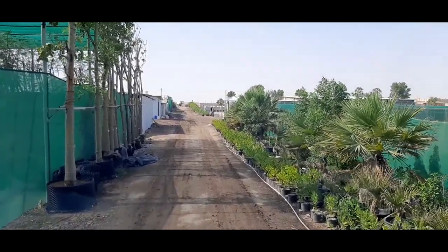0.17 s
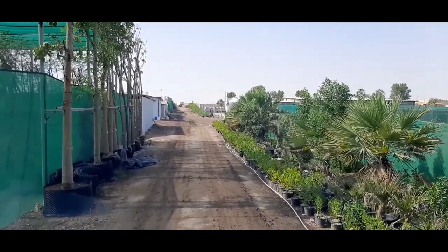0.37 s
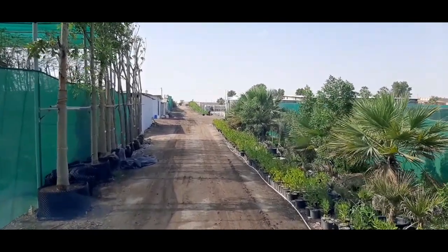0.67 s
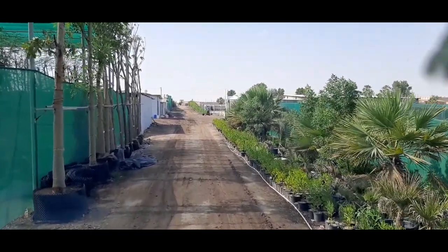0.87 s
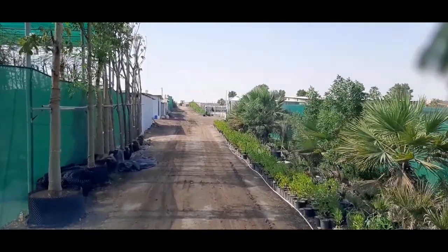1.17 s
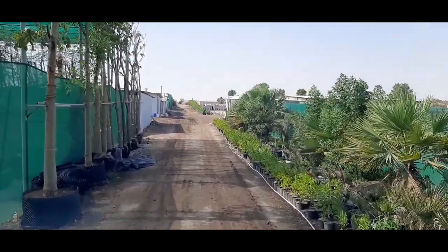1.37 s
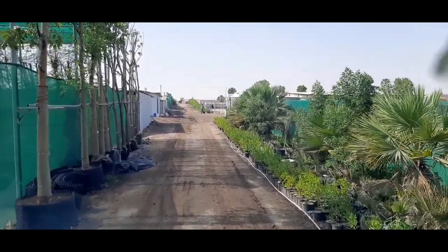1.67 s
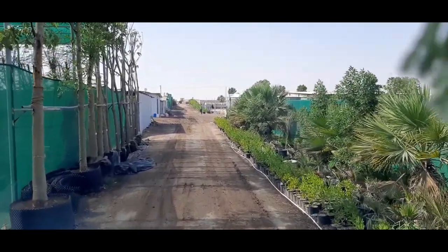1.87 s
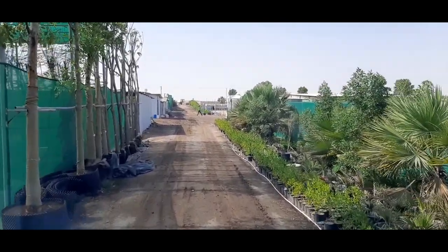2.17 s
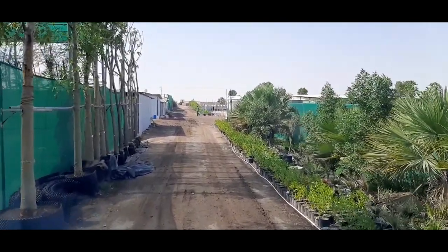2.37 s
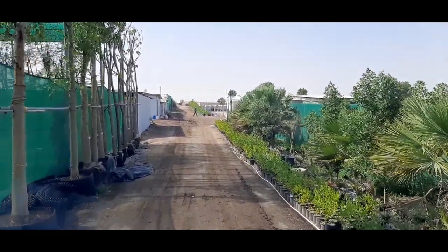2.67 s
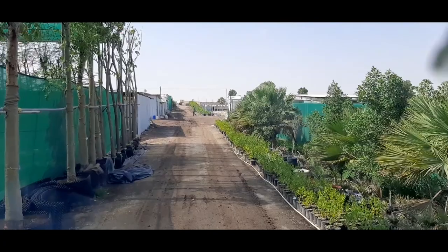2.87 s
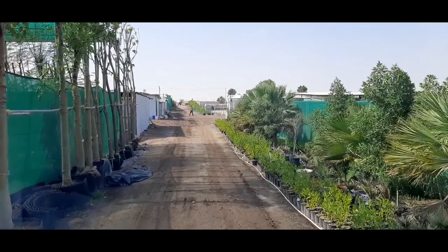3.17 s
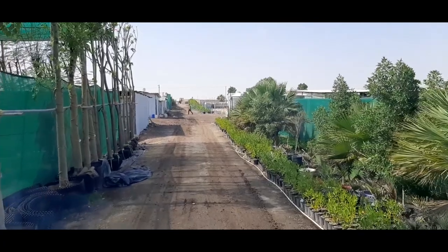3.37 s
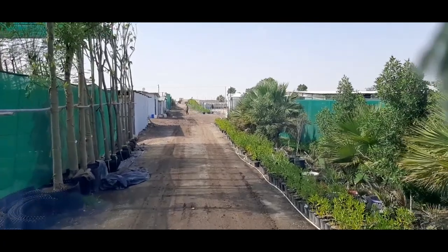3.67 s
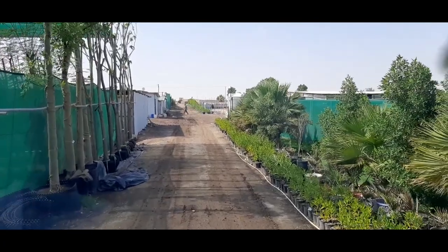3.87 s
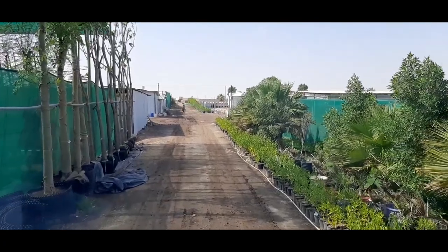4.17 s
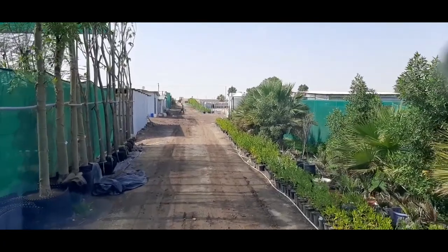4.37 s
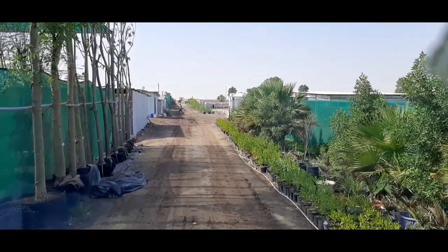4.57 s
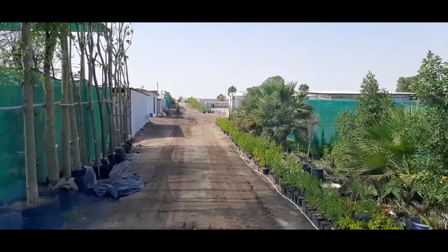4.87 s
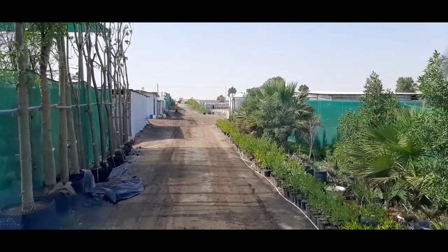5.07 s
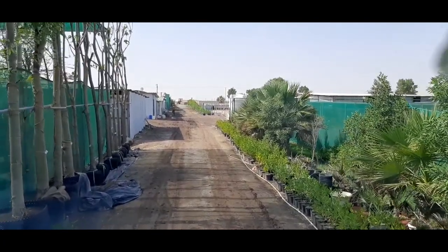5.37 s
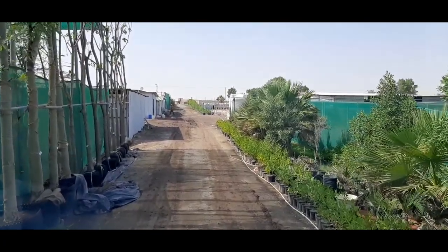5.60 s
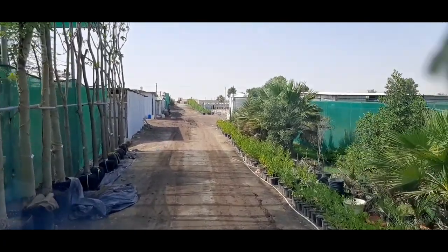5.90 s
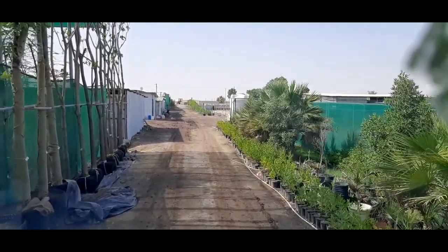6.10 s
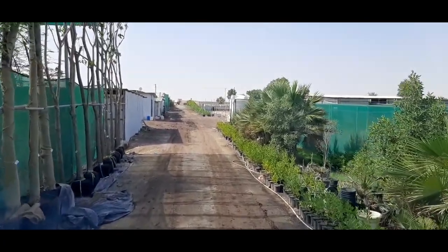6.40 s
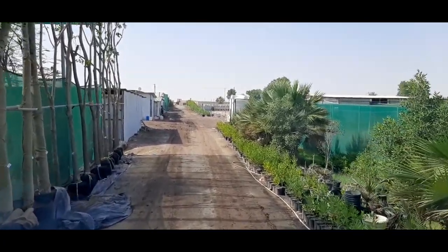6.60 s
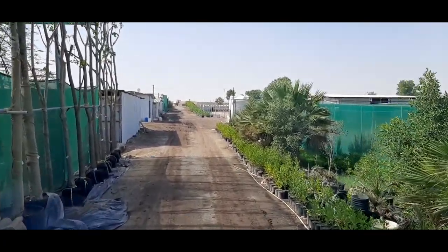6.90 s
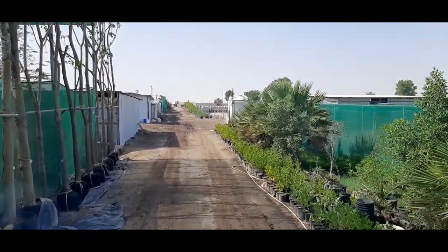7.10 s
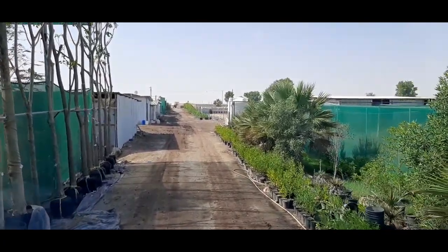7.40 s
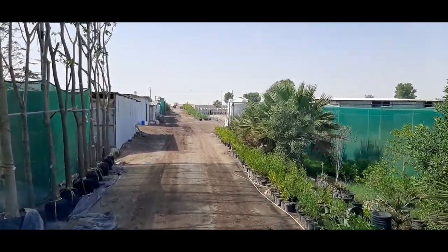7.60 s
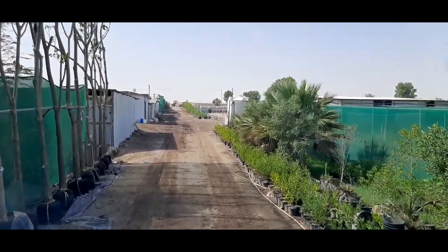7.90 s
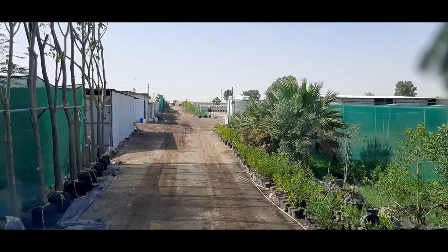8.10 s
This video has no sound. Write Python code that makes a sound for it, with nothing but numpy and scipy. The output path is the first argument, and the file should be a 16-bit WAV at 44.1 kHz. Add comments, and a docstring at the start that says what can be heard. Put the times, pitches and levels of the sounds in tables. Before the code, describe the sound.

A diesel truck's engine drones inside the cab at low speed, with road rumble, rattling trim and a few bumps.

```python
"""Inside a slow diesel truck on a dirt track

A six-cylinder engine booms in the cab as a stack of low tones, and each firing adds a knock.
The road rumbles through the cab panels. Loose trim buzzes in short puffs of noise, grit and
small parts tick, ruts jolt the cab into a low ring, and two bumps knock a panel.
The steady sounds reach the right side of the microphone a little before the left."""
import sys
import numpy as np
from scipy import signal
from scipy.fft import rfft, irfft, next_fast_len
from scipy.io import wavfile

SR = 44100
rng = np.random.default_rng(int(sys.argv[2]) if len(sys.argv) > 2 else 0)


def bounce(signal):
    """Save signal as a 16-bit WAV file at the path given by the first command-line argument."""
    frames = np.transpose(np.atleast_2d(signal))
    limited = np.clip(frames, -1, 1)
    pcm = np.round(limited * 32767).astype(np.int16)
    wavfile.write(sys.argv[1], SR, pcm)


N = 363825
TIME = np.arange(N) / SR
SIZE = next_fast_len(N)
HZ = np.fft.rfftfreq(SIZE, 1 / SR)

# How hard the engine works: time_s, load (0 coasting, 1 pulling)
LOAD = [(0, 0.73), (.4, 0.34), (4.2, 0.37), (4.7, 0.94), (5.8, 0.53), (6.3, 1), (8.25, 0.82)]
# How often the engine fires: time_s, firings_per_s
FIRING_RATE = [(0, 44.75), (.75, 43.55), (1.2, 43.7), (1.55, 43.35), (2.05, 44.55), (2.45, 44.1), (3, 44.2),
               (3.4, 43.85), (4.2, 44.35), (4.8, 45.9), (5.15, 46.1), (5.7, 45.7), (6.05, 46.35),
               (6.4, 47.4), (6.7, 47.2), (7.1, 48.9), (7.4, 49.75), (7.8, 49.8), (8.25, 51.45)]
# How the six cylinders differ: delay_in_firings, strength_db
CYLINDERS = [(0.049, 2), (0.032, 3.5), (-0.0052, -21), (0.0045, -6), (-0.021, -3.5), (0.016, 1)]


def gain_of(db):
    """Turns decibels into a number to multiply by."""
    return 10 ** (np.asarray(db) / 20)


def evened(x):
    """Scales a signal to an average (rms) level of 1."""
    return x / np.sqrt(np.mean(x ** 2) + 1e-20)


def curve(rows, column=1, t=TIME):
    """Reads one column of a time table at the times t."""
    rows = np.array(rows)
    return np.interp(t, rows[:, 0], rows[:, column])


def spectrum(rows, column=1):
    """Reads one column of a pitch table at every frequency."""
    rows = np.array(rows)
    return np.interp(np.log(HZ + 1), np.log(rows[:, 0] + 1), rows[:, column])


def ringing(modes):
    """A gain that lifts the pitches at which an object likes to ring."""
    peaks = sum((gain_of(2 * db) - 1) / (1 + (2 * (HZ - hz) / width) ** 2) for hz, width, db in modes)
    return np.sqrt(1 + peaks)


def coloured(x, gain):
    """Filters a sound with one gain for each frequency."""
    return irfft(rfft(x, SIZE) * gain, SIZE)[..., :N]


def drift(top_hz, t=TIME):
    """A random wobble of average size 1, no faster than top_hz."""
    knots = TIME[::200]
    rates = np.geomspace(top_hz / 10, top_hz, num=12)
    waves = sum(np.sin(2 * np.pi * (hz * knots + rng.random())) / np.sqrt(hz) for hz in rates)
    return np.interp(t, knots, evened(waves))


def by_load(pair, load):
    """Blends a (coasting, pulling) pair of values."""
    return pair[0] + load * (pair[1] - pair[0])


def stereo(a, b):
    """Makes left and right from two sounds: both sides share a, which comes later on the left."""
    # How alike the two sides are: pitch_hz, likeness (0 to 1), left_lead_rad
    likeness = [(50.3, 1, -1.7), (125, 1, -1.5), (290, 0.79, -0.5), (563, 0.37, -0.1), (990, 0.3, -2.5),
                (1390, 0.49, -3.5), (2480, 0.1, -6.5), (4820, 0, -12.5), (15900, 0.34, -46)]
    # Which side is louder: pitch_hz, left_minus_right_db
    balance = [(60, 3), (200, 1.5), (380, -.5), (700, 2), (1290, 1), (2380, 1.5), (4400, -1), (8120, -3.5),
               (15000, -4.5)]
    a, b = rfft(a, SIZE), rfft(b, SIZE)
    lean = gain_of(spectrum(balance) / 2)
    alike = np.clip(spectrum(likeness), 0, 1)
    left = a * np.exp(1j * spectrum(likeness, column=2)) * lean
    right = (alike * a + np.sqrt(1 - alike ** 2) * b) / lean
    return irfft(np.array([left, right]), SIZE)[:, :N]


def pan(db, lean_db):
    """Left and right gains around db, with the left louder by lean_db."""
    return gain_of(db + np.array([[.5], [-.5]]) * lean_db)


def tone(angle, db, lean_db, lead_rad):
    """A stereo sine wave whose left side is ahead by lead_rad."""
    return np.sqrt(2) * pan(db, lean_db) * np.cos([angle + lead_rad / 2, angle - lead_rad / 2])


def add(mix, start_s, sound):
    """Lays a stereo sound into the mix."""
    part = mix[:, round(start_s * SR):][:, :sound.shape[1]]
    part += sound[:, :part.shape[1]]


def engine_boom(firings):
    """Wavering tones bunch into a chug. A tone of order n swings n times in each six firings."""
    # The two main tones: time_s, boom_db (order 12), drone_db (order 14)
    main_levels = [(0, -18, -52), (.6, -24, -43), (.85, -42, -30), (1.3, -25.5, -41), (1.8, -35, -34),
                   (2.15, -22, -34), (2.55, -24.5, -32), (2.8, -43, -35), (3.05, -21, -70), (3.4, -27, -52),
                   (4.4, -23, -34.5), (4.85, -21.5, -15.5), (5.65, -24, -21), (6, -23.5, -30.5),
                   (6.25, -21, -24.5), (6.55, -21.5, -16.5), (7.2, -20, -22.5), (7.55, -26, -28),
                   (7.85, -20.5, -19), (8.25, -23, -33)]
    # Low engine tones, each with its own level and place left to right:
    # order, left_minus_right_db, left_lead_rad
    boom_tones = [(6, 3.9, -1.), (12, 2.8, -.15), (14, 3.5, -.8), (16, 1.9, -.7), (18, 1.5, -.6)]
    # Further engine hum tones, blended between coasting and pulling: order, coasting_db, pulling_db
    hum_tones = [(8, -43, -36.5), (9, -56, -29.5), (10, -46.5, -26), (13, -48, -46), (15, -25.5, -39.5),
                 (19, -29.5, -46.5), (20, -42, -50), (21, -48, -33), (23, -29.5, -53.5), (24, -37.5, -51),
                 (30, -44.5, -43), (34, -55, -46.5), (46, -65, -50.5)]
    # High tones that whine through the wall behind the engine: order, coasting_db, pulling_db
    whine_tones = [(54, -64, -55), (60, -62, -51), (66, -60, -49), (69, -60, -53), (70, -52, -64),
                   (72, -54, -50), (75, -55, -50), (78, -57, -56), (81, -47.5, -50), (86, -52, -50),
                   (90, -52, -48)]
    # Tones that trail the chug and fill its gaps: order, delay_turns
    late_turns = {6: .5, 9: .25, 16: .25, 21: .25, 24: .25}
    step = 10  # low tones need only every tenth sample
    t, out = TIME[::step], 0
    load = np.clip(curve(LOAD, t=t), 0, 1)
    cycle_rad = 2 * np.pi * firings[::step] / len(CYLINDERS) + 2.14
    cycle_hz = curve(FIRING_RATE, t=t) / len(CYLINDERS)
    chug_rad = by_load((0, -1), load)

    def angle_of(order, wobble_rad):
        steady = order * cycle_rad + chug_rad - 2 * np.pi * late_turns.get(order, 0)
        return steady + wobble_rad * drift(3, t)

    firing_db = by_load((-51, -32), load)
    boom_db, drone_db = curve(main_levels, t=t), curve(main_levels, column=2, t=t)
    order_16_db = by_load((-31, -32.5), load)
    order_18_db = by_load((-20, -30.5), load) + .28 * (boom_db - boom_db.mean())
    levels = firing_db, boom_db, drone_db, order_16_db, order_18_db
    for (order, lean_db, lead_rad), db in zip(boom_tones, levels):
        angle = angle_of(order, wobble_rad=.18)
        waver_db = by_load((1.6, .9), load) * drift(4.4, t)
        out += tone(angle, db + waver_db, lean_db, lead_rad)
    for order, *pair_db in hum_tones:
        angle = angle_of(order, wobble_rad=by_load((.48, .26), load))
        db = by_load(pair_db, load) + by_load((3, 1.1), load) * drift(2.5, t)
        if order == 30:  # this tone dies away above 236 Hz
            db -= .5 * np.maximum(order * cycle_hz - 236, 0)
        out += tone(angle, db, lean_db=2.2, lead_rad=-.75)
    for order, *pair_db in whine_tones:
        wall_loss_db = .15 * np.maximum(order * cycle_hz - 625, 0)  # fades above 625 Hz
        db = by_load(pair_db, load) - wall_loss_db + 1.8 * drift(2.5, t)
        angle = order * cycle_rad + 2 * np.pi * rng.random() + .62 * drift(3, t)
        out += tone(angle, db, lean_db=5, lead_rad=-.16)
    return signal.resample_poly(out, step, 1, axis=1, window=("kaiser", 10))[:, :N]


def firing_knock(firings):
    """Each firing strikes the engine block; the cylinders differ in strength and timing."""
    # Tone colour of the knock: pitch_hz, level_db
    knock_colour = [(150, -45.5), (300, -13), (500, 16), (680, 4), (800, -8), (1250, -31), (2500, -40),
                    (4000, -53.5)]
    count = np.arange(1, int(firings[-1]))
    delay, db = np.array(CYLINDERS)[count % len(CYLINDERS)].T
    timing_jitter, level_jitter = rng.standard_normal((len(count), 2)).T
    start_s = np.interp(count + delay + .003 * timing_jitter, firings, TIME)
    blows = np.zeros(N)
    blows[(start_s * SR).astype(int)] = gain_of(db + .55 * level_jitter)
    # the block answers every blow with the same short scatter of echoes
    echoes = rng.standard_normal((2, 1500)) * gain_of(-60 * TIME[:1500] / .081)
    knocks = signal.oaconvolve(blows[None], echoes)[:, :N]
    a, b = coloured(knocks, gain_of(spectrum(knock_colour)))
    return gain_of(-49 + .61 * curve(LOAD)) * evened(stereo(a, b))


def road_rumble(firings):
    """Noise comes through the cab panels, throbbing a little with each firing and with the road."""
    # Road and engine noise in the cab: pitch_hz, level_db
    rumble_colour = [(18, -67), (33, -34), (60, -10), (78, 0), (119, -1), (148, -6), (221, -17),
                     (351, -20.5), (439, -24.5), (654, -25.5), (747, -27.5), (1220, -31.5), (1450, -37.5),
                     (1980, -40), (3940, -54.5), (6000, -62), (7800, -100), (13200, -120)]
    # Panels that ring along: pitch_hz, width_hz, boost_db
    panel_rings = [(295, 70, 3), (359, 16, 7), (510, 28, 6), (595, 7, 8), (665, 35, 7), (833, 8, 9),
                   (858, 20, 4), (924, 22, 5), (1200, 45, 5), (1250, 9, 6), (1385, 20, 4), (1690, 40, 3),
                   (1960, 60, 3), (2502, 14, 10)]
    # How the rumble rises and falls: time_s, level_db
    road_level = [(0, -32), (.5, -32.5), (1.6, -32), (2, -31), (2.5, -32.5), (3.5, -31.5), (4.5, -31.5),
                  (5.5, -33), (6.5, -32.5), (7.5, -33.5), (8.25, -32)]
    a, b = coloured(rng.standard_normal((2, N)), gain_of(spectrum(rumble_colour)) * ringing(panel_rings))
    mid_level = np.sqrt(np.mean(coloured(a, (HZ > 200) & (HZ < 1500)) ** 2))
    throb_db = 1.5 * np.cos(2 * np.pi * firings) + .45 * drift(12)
    return gain_of(curve(road_level) - 1 + throb_db) * stereo(a, b) / mid_level


def trim_buzz():
    """Each tap of loose trim is a puff of noise and a short scrape, over a faint hiss."""
    # The clearest taps: start_s, level_db, dull_band_offset_db, scrape_offset_db
    clear_taps = [(0.0438, -53, -1, -9), (0.0593, -52, -3, -9), (0.19, -47, -4, -15),
                  (0.6225, -43, -6, -12), (0.6918, -41, 0, -5), (0.8759, -40, 3, -17),
                  (0.9797, -37, -6, -5), (1.068, -38, 0, -7), (1.1922, -45, -1, -15), (1.2665, -37, 0, -4),
                  (1.5529, -61, -3, -14), (1.6846, -47, -8, -14), (1.9904, -40, 5, -11),
                  (2.0772, -34, 7, -14), (2.2443, -47, -1, -11), (2.2932, -39, -5, -16),
                  (2.3206, -34, -11, -8), (2.4364, -36, 3, -11), (2.6209, -37, -2, -9),
                  (2.7317, -55, -5, -9), (2.9771, -40, 1, -9), (3.1742, -46, -15, -9),
                  (3.2201, -46, -1, -13), (3.2575, -39, 5, -19), (3.4356, -40, -1, -9),
                  (3.4845, -38, 3, -9), (3.5753, -37, -1, -12), (3.8077, -49, -9, -15),
                  (3.8417, -45, 2, -5), (3.8836, -40, 1, -7), (3.918, -38, 3, -15), (3.9419, -41, -1, -7),
                  (4.0262, -33, 3, -12), (4.0841, -43, -1, -4), (4.1674, -38, -1, -13),
                  (4.2577, -54, -7, -11), (4.3046, -45, -1, -13), (4.3186, -38, -1, -11),
                  (4.3939, -40, -6, -9), (4.4593, -42, -10, -9), (4.5151, -41, -9, -7),
                  (4.5905, -42, 2, -7), (4.6907, -46, -1, -9), (4.7127, -40, -8, -21),
                  (4.794, -44, -6, -11), (4.889, -38.5, 2, -6), (5.0574, -39, 2, -6), (5.2934, -41, 1, -16),
                  (5.3393, -40, -3, -9), (5.3901, -42, 4, -15), (5.4226, -53, -3, -18),
                  (5.4794, -40, 4, -9), (5.5478, -40, -3, -16), (5.6605, -44, 5, -6), (5.682, -39, 0, -9),
                  (5.7997, -41, -1, -9), (5.8795, -39, 1, -6), (5.9604, -36, 1, -7), (6.0526, -44, -1, -17),
                  (6.1978, -46, -5, -9), (6.2143, -38, -8, -5), (6.2776, -43, -6, -15),
                  (6.3056, -39, -5, -9), (6.4158, -49, -3, -9), (6.4338, -37, -5, -8),
                  (6.4966, -37.5, 2, -6), (6.6383, -41, -1, -10), (6.8349, -62, -11, -13),
                  (7.3961, -53, -4, -13), (7.4535, -39, 3, -9), (7.4859, -43, -3, -15),
                  (7.6854, -45, -1, -5), (7.7648, -43, 10, -10), (7.7902, -43, 3, -9),
                  (7.8311, -37, -1, -8), (7.8875, -43, -1, -9), (7.9518, -40, -6, -9), (8.0177, -41, 3, -8),
                  (8.0581, -42, -1, -10), (8.1115, -40, -5, -10)]
    # Lighter chatter between them: time_s, level_db
    chatter_level = [(0, -36), (.5, -42.5), (1.7, -32), (2.7, -37), (4.4, -33), (5.4, -40.5), (6.9, -42),
                     (7.8, -36), (8.25, -56)]
    # Tone colour of the buzz: pitch_hz, level_db
    trim_colour = [(1500, 7), (2800, 0), (4500, -1.5), (7000, -2.5), (9000, -4), (11000, -2.5), (13000, -4),
                   (14500, -5), (16000, -5)]
    # Where the trim rings: pitch_hz, width_hz, boost_db
    trim_rings = [(2500, 150, 4), (7510, 130, 6), (11080, 300, 2.5), (14420, 300, 3)]
    gap_s, rise_s, puff_s, scrape_s = .022, .0012, .0037, .039
    light_s = np.arange(0, TIME[-1] - gap_s, gap_s)
    light_s += rng.random(len(light_s)) * gap_s
    light_taps = [(s, db - 8, 0, -10.5) for s, db in zip(light_s, curve(chatter_level, t=light_s))]
    start_s, db, dull_db, scrape_db = np.transpose(light_taps + clear_taps)
    # three bands (dull, bright, top) each get their own random strength
    chance_db = np.array([[2], [1.5], [3.5]]) * rng.standard_normal((len(start_s), 3)).T
    db = db - .5 + np.outer([1, 0, 0], dull_db) + chance_db
    taps, scrapes = np.zeros((2, 3, N))
    starts = (start_s * SR).astype(int)
    taps[:, starts] = gain_of(db)
    scrapes[:, starts] = gain_of(db + scrape_db)
    t = TIME[None, :4000]
    rise = (1 - np.exp(-t / rise_s)) ** 2
    hiss = gain_of(-51.5 + 2.9 * drift(48) + 1.7 * np.array([drift(30) for _ in range(3)]))
    puffs = signal.oaconvolve(taps, rise * np.exp(-t / puff_s))[:, :N]
    scraping = signal.oaconvolve(scrapes, rise * np.exp(-(t / scrape_s) ** 2))[:, :N]
    colour = evened(gain_of(spectrum(trim_colour)) * ringing(trim_rings))
    high, top = (1 / (1 + (hz / (HZ + 1)) ** 6) for hz in (6500, 10500))
    bands = 1 - high, high * (1 - top), high * top
    a, b = sum(coloured(rng.standard_normal((2, N)) * level, colour * np.sqrt(band))
               for level, band in zip(hiss + puffs + scraping, bands))
    return gain_of(-3) * stereo(a, b)


def tick(hz, clack_db):
    """One small hit: a dry burst of noise spreading up from hz, a thin ring and a duller clack."""
    t, f = TIME[:4096], np.fft.rfftfreq(4096, 1 / SR)
    a, b = rfft(rng.standard_normal((2, 4096)))
    width_hz = np.where(f < hz, .12, .5) * hz  # falls off steeply below its pitch
    burst = evened(irfft(a / (1 + ((f - hz) / width_hz) ** 2) / (1 + (f / 8200) ** 8)))
    clack = evened(irfft(b / (1 + ((f - 1900) / 790) ** 2) * (f > 700)))
    ring = gain_of(-1 - 60 * t / .045) * np.sin(2 * np.pi * (hz * t + rng.random()))
    rise = 1 - np.exp(-t / .0007)
    fall = .65 * gain_of(-60 * t / .065) + .35 * gain_of(-60 * t / .12)
    return ((burst + clack * gain_of(clack_db)) * fall + ring) * rise


def grit():
    """Grit and fittings tick faintly at random, more often on the rougher first stretch."""
    out = np.zeros((2, N))
    for when, size, pitch, side in rng.random((120, 4)):
        gains = pan(-64 + 6 * size, lean_db=6 * side - 21)  # well to the right
        add(out, when ** 1.3 * N / SR, gains * tick(2400 * 2.5 ** pitch, clack_db=0))
    return out


def rut_jolts():
    """Each rut jolts the cab, which swells into a low ring at its own pitch and dies away."""
    # The jolts: start_s, level_db, pitch_hz
    jolts = [(0.3, -13.5, 104), (1.331, -16, 119.3), (1.861, -8, 114), (2.124, -15, 102.8),
             (2.348, -15, 113), (4.152, -15, 115.4)]
    rise_s, fade_s = .014, .58  # fade_s is the time to drop 60 dB
    out, t = np.zeros((2, N)), TIME[:SR]
    for start_s, db, hz in jolts:
        angle = 2 * np.pi * (hz * t + rng.random())
        ring = tone(angle, db - 60 * t / fade_s, lean_db=1.8, lead_rad=-.52)
        add(out, start_s, ring * (1 - np.exp(-t / rise_s)) ** 2)
    return out


def loose_parts():
    """Small loose parts tick around the cab, each at its own pitch."""
    # The ticks: start_s, level_db, pitch_hz, clack_offset_db, left_minus_right_db
    ticks = [(0.384, -56, 3400, -9, -1.5), (0.719, -46.5, 3400, -17, 4), (0.7503, -45, 4200, -16, 5),
             (1.066, -52, 4170, 5, 4), (1.29, -52, 3390, -5, -7), (1.335, -49.5, 2580, 3.5, 0),
             (1.3564, -46, 3540, 2, 1), (1.654, -50.5, 3030, 6, 7), (1.803, -48, 3580, -15, 3),
             (1.99, -38, 6140, 1, 7), (2.075, -45, 3160, -1, -0.5), (2.1281, -53, 5800, -13, 10),
             (2.1393, -49, 3820, 10.5, 6), (2.2159, -46.5, 4180, 0, 6), (2.438, -53, 4340, 2, 3),
             (3.449, -48, 3340, -12, 0.0), (3.6236, -49, 3240, 2, 3), (3.884, -52, 3150, 5, -5),
             (4.0272, -46, 2970, -6, 2), (4.0841, -61, 3047, -3, -1), (4.7076, -42.5, 6150, -13, 7),
             (4.71, -51, 4200, 0, 5), (4.922, -50, 2370, 4, 0), (4.937, -51, 2350, 2, 0),
             (5.179, -50, 3450, -19, 5), (6.6605, -50, 5200, -10, 6), (6.663, -46, 3880, -2, 6),
             (7.3463, -49, 3900, 3, 4)]
    out = np.zeros((2, N))
    for start_s, db, hz, clack_db, lean_db in ticks:
        add(out, start_s, pan(db + 2.5, lean_db) * tick(hz, clack_db))
    return out


def panel_knocks():
    """Two bumps each knock a panel several times; it rings briefly, with a wooden rattle."""
    # The knocks: start_s, level_db, left_minus_right_db
    knocks = [(2.054, -15.5, 6), (2.0605, -24, 3), (2.0715, -13, -5), (2.079, -18, 18.5), (2.092, -24, 0),
              (3.6062, -16.5, 7), (3.612, -24, 16), (3.624, -16, -13), (3.630, -16, 11), (3.644, -28, 0),
              (3.654, -26, 0)]
    # The notes the panel rings at: pitch_hz, level_db, fade_s (time to drop 60 dB)
    panel_notes = [(316, -7.5, 0.044), (445, -1.5, 0.061), (493, -3, 0.068), (566, -7, 0.045),
                   (680, -3.5, 0.043), (852, -10, 0.027), (1005, -16, 0.028), (1400, -26, 0.014),
                   (1810, -22, 0.04), (2160, -20, 0.03), (2800, -22, 0.044)]
    out, t = np.zeros((2, N)), TIME[:5000]
    rattle_band = signal.butter(4, (700, 2940), "bandpass", fs=SR, output="sos")
    rattle_fade = gain_of(-22.5 - 60 * t / .095)
    rise = 1 - np.exp(-t / .0003)
    for start_s, db, lean_db in knocks:
        ring = 0
        for hz, note_db, fade_s in panel_notes:
            detune, strength, phase = rng.standard_normal(3)
            wave = np.sin(2 * np.pi * hz * (1 + .02 * detune) * t + .79 * phase)
            ring += gain_of(note_db + .92 * strength - 60 * t / fade_s) * wave
        rattle = evened(signal.sosfilt(rattle_band, rng.standard_normal((2, len(t)))))
        add(out, start_s, pan(db - 5, lean_db) * rise * (ring + rattle_fade * rattle))
    return out


def scene():
    """Engine, road and cab together."""
    firings = np.cumsum(curve(FIRING_RATE)) / SR  # running count of engine firings
    low_sounds = engine_boom(firings) + rut_jolts() + firing_knock(firings) + road_rumble(firings)
    return low_sounds + trim_buzz() + loose_parts() + panel_knocks() + grit()


def record(dry):
    """The microphone drops the deepest bass, and the very highest treble is cut off."""
    low_cut = signal.butter(3, 33, "highpass", fs=SR, output="sos")
    high_cut = signal.firwin(2047, 15780, window=("kaiser", 9), fs=SR)
    return signal.oaconvolve(signal.sosfilt(low_cut, dry), high_cut[None], "same")


dry = scene()
out = record(dry)
bounce(out)
```